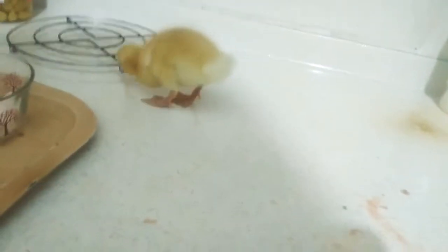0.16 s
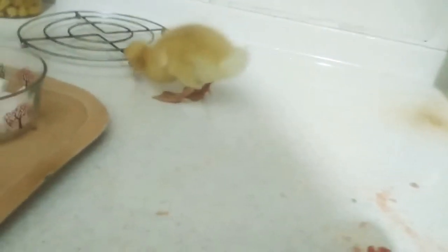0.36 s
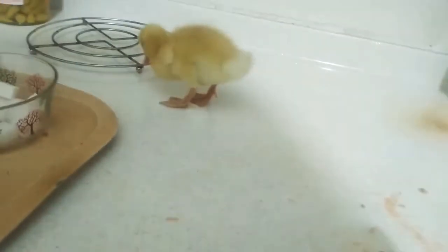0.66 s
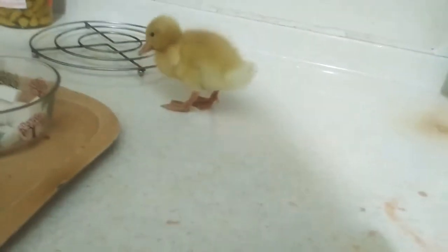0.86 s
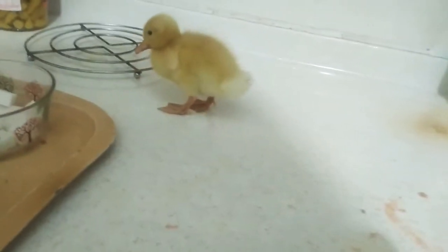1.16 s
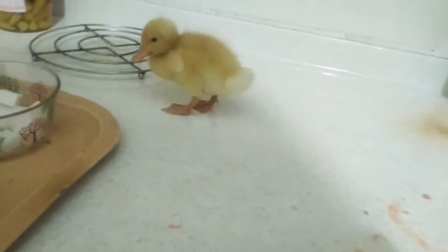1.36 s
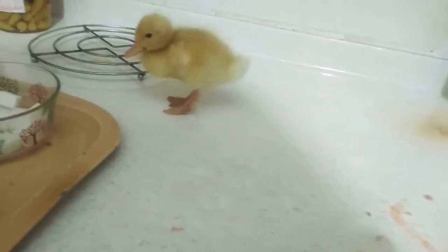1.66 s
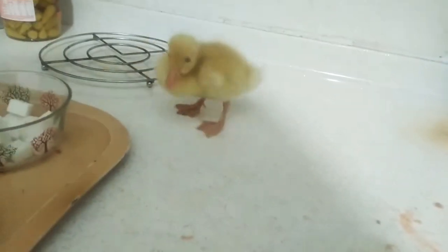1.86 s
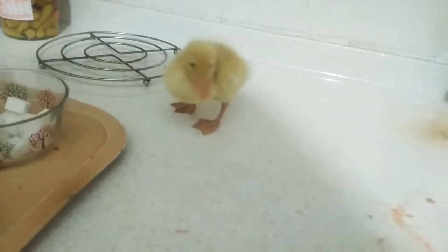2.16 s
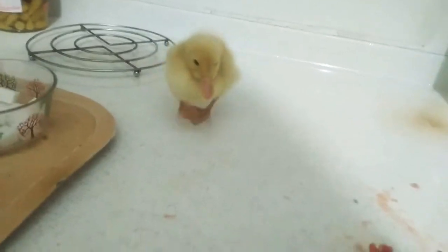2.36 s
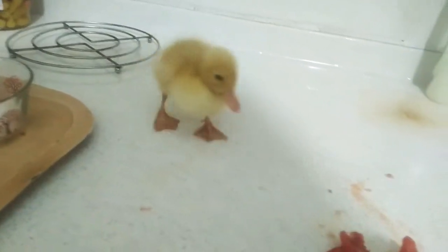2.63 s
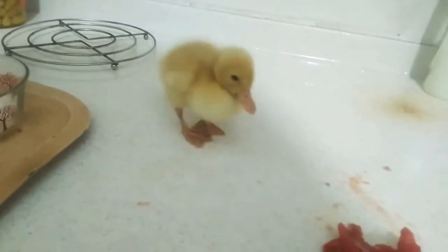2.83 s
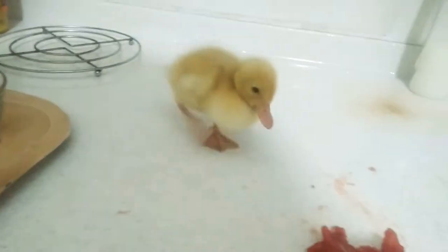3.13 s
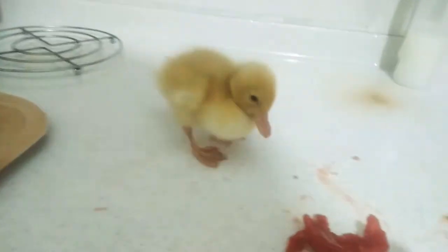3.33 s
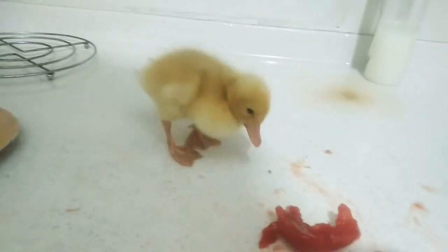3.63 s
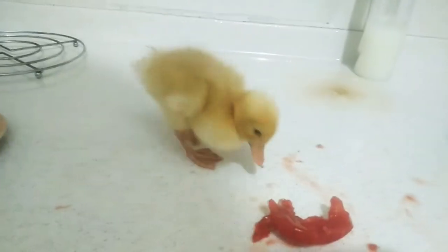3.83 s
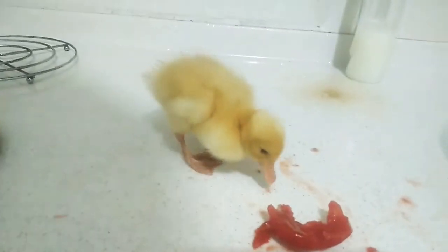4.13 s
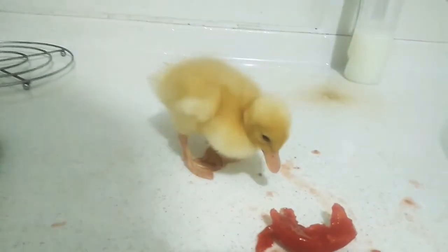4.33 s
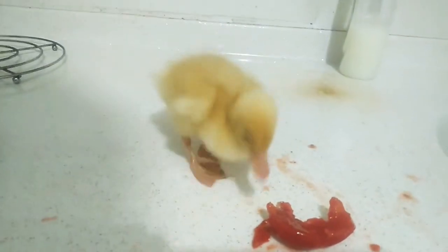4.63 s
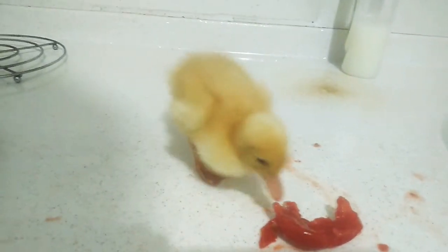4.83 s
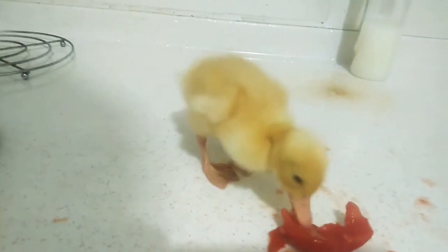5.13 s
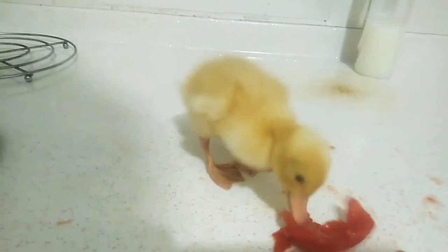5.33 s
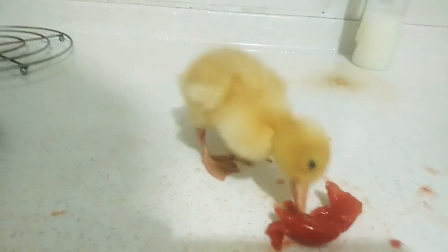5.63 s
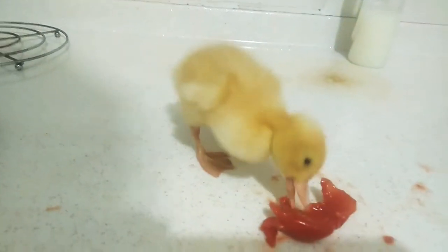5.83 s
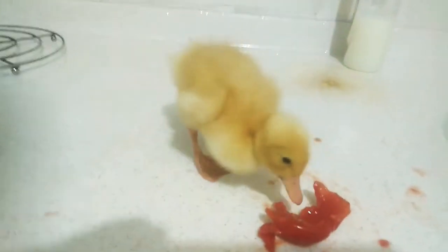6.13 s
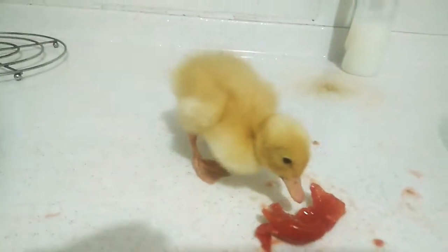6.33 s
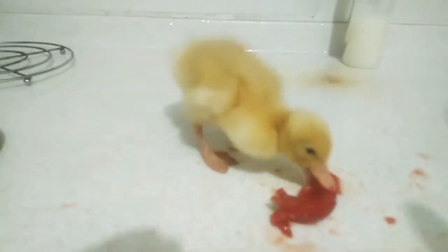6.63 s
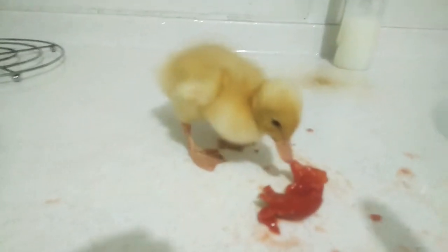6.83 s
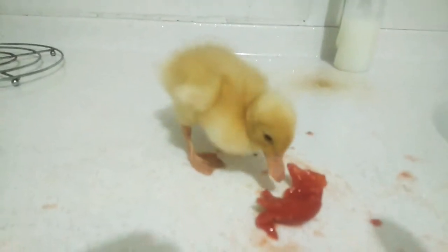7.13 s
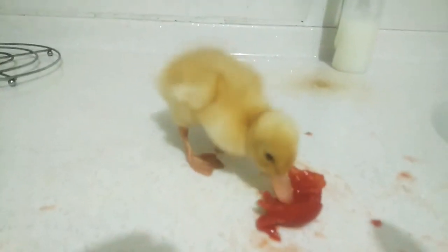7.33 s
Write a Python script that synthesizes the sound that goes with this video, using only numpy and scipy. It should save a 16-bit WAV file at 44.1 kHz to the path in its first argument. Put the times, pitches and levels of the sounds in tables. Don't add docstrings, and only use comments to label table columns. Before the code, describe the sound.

A duckling gives short whistled peeps and warbles near a worktop being tapped steadily, then a finger scrapes across the microphone.

```python
import sys
import numpy as np
from scipy import signal
from scipy.fft import rfft, irfft
from scipy.io import wavfile
from scipy.ndimage import uniform_filter1d

SR = 44100
rng = np.random.default_rng(int(sys.argv[2]) if len(sys.argv) > 2 else 0)


def boost_factor(decibels):
    exponent = np.asarray(decibels, float) / 20
    return 10 ** exponent


def to_wav(s):
    ch = np.atleast_2d(s).T
    pcm = np.round(np.clip(ch, -1, 1) * 32767)
    wavfile.write(sys.argv[1], SR, pcm.astype(np.int16))


N = 329868
T = np.arange(N) / SR
HALF_SECOND = T[:SR // 2]
HZ = np.fft.rfftfreq(N, 1 / SR) + 1
PAUSE_DB, PAUSE_TOP_HZ = 16, 12800


def on_hz(table, hz=HZ):
    f, v = np.transpose(table)
    return np.interp(np.log(hz), np.log(f), v)


def colour(x, gain):
    return irfft(rfft(x) * gain, N)


def unit(x):
    return x / np.sqrt(np.mean(x ** 2))


def walk(rate, shape=()):
    k = int(SR / rate)
    held = np.repeat(rng.standard_normal(shape + (N // k + 1,)), k, axis=-1)[..., :N]
    return unit(uniform_filter1d(uniform_filter1d(held, k), k))


def noise():
    return rng.standard_normal((2, N))


def spikes(s, size):
    x = np.zeros(N)
    x[np.round(np.asarray(s) * SR).astype(int)] = size
    return x


def sides(pan_db):
    return boost_factor(np.array([pan_db, -pan_db]) / 2)


def fold(x, response):
    return signal.fftconvolve(np.atleast_2d(x), np.atleast_2d(response), axes=1)[:, :N]


def room(x, t60, wet_db, gap_s):
    t = HALF_SECOND
    tail = rng.standard_normal((2, len(t))) * boost_factor(-60 * t / t60) * (t > gap_s)
    return fold(x, tail / np.sqrt(np.sum(tail ** 2) / 2)) * boost_factor(wet_db)


def treble():
    split_hz = 589
    return 1 / (1 + (split_hz / HZ) ** 12)


# f/Hz, level/dB per Hz
AIR = [(12, -26), (20, 0.5), (70, -9), (134, -11), (161, -18), (268, -20.5), (458, -25), (496, -33.5),
       (583, -34.5), (666, -42.5), (742, -37.5), (996, -44.5), (4230, -47.5), (5100, -49.5), (12000, -57),
       (15600, -63), (22000, -120)]
# f/Hz, share 0-1
LIKENESS = [(25, 0.27), (60, 0.37), (130, 0.89), (290, 0.56), (640, 0.31), (1400, 0.04), (15000, 0)]
# f/Hz, width/Hz, level/dB
HUMS = [(279.8, 38, -71.5), (595, 37, -94.5)]


def kitchen():
    like = np.clip(on_hz(LIKENESS), 0, 1)
    air_db = on_hz(AIR, np.minimum(HZ, 12000))
    air_db = air_db - 0.58 * (HZ > PAUSE_TOP_HZ)
    mid, side = rfft(noise()) * np.sqrt([1 + like, 1 - like]) * boost_factor(air_db)
    air = np.array([mid + side, mid - side])
    out = 0
    for octave in range(4, 16, 2):
        share = np.cos(np.pi / 4 * np.clip(np.log2(HZ) - octave, -2, 2)) ** 2
        out = out + irfft(air * share, N) * boost_factor(0.72 * walk(4.9))
    out = out * boost_factor(-61.5) / np.sqrt(np.mean(out.mean(axis=0) ** 2))
    for hz, width, db in HUMS:
        resonance = 1 / (1 + (2 * (HZ - hz) / width) ** 2)
        out = out + boost_factor(db) * unit(colour(rng.standard_normal(N), resonance))
    return out + colour(out, treble()) * (boost_factor(PAUSE_DB) - 1)


# t/s, sliding level/dB, pressure level/dB
STROKES = [
    [(6.74, -76, -68), (6.798, -59.5, -62), (6.83, -58, -70), (6.872, -59, -65), (6.974, -49.5, -51.5),
     (7.03, -57, -57), (7.075, -70, -54)],
    [(7.115, -88, -53), (7.142, -73, -39.5), (7.2, -61, -34), (7.25, -50.5, -40.5), (7.3, -89, -42.5)],
    [(7.3, -96, -52), (7.324, -74, -32.5), (7.374, -57, -42.5), (7.42, -86, -70)],
]


def strokes():
    hiss_db, rumble_db = np.full((2, N), -140.)
    for stroke in STROKES:
        s, slide, press = np.transpose(stroke)
        on = slice(int(s[0] * SR), int(s[-1] * SR))
        hiss_db[on] = np.interp(T[on], s, slide)
        rumble_db[on] = np.interp(T[on], s, press)
    grip_db = rumble_db + 56
    slip_db = 3.2 * np.minimum(grip_db, 0)
    scrape_db = -57.0 + 0.43 * (hiss_db + 54) + 0.68 * grip_db + slip_db
    grains = noise() * boost_factor(2.92 * rng.exponential(size=(2, N))) * boost_factor(walk(120))
    hiss_colour = [(2000, -27.0), (4000, -4), (8000, -6), (12000, -5.5), (15500, 0.5)]
    scrape_colour = [(200, 3.5), (700, 0.5), (2500, 0.0), (5000, -8.5), (9000, -29)]
    rumble_colour = [(15, 7), (40, 0.5), (200, -15.5), (500, -24.0), (2000, -51)]
    hiss = unit(colour(grains, boost_factor(on_hz(hiss_colour))))
    scrape = unit(colour(grains, boost_factor(on_hz(scrape_colour))))
    rumble = unit(colour(noise(), boost_factor(on_hz(rumble_colour))))
    left_db = np.array([hiss_db + 11.0, scrape_db + 7.5, rumble_db + 3.5])
    leak_db = np.array([[-42.], [-26.], [-24.]])
    gains = boost_factor(np.stack([left_db, left_db + leak_db], axis=1))
    return (np.array([hiss, scrape, rumble]) * gains).sum(axis=0)


# t/s, level/dB, signed push, fade/s
JOLTS = [
    (7.182, -20, -1.44, 0.0023),
    (7.211, -17, 0.74, 0.011),
    (7.251, -16, -0.64, 0.0055),
    (7.277, -14, 0.34, 0.0055),
    (7.315, -16, -1.66, 0.0021),
    (7.339, -15.5, 1, 0.0062),
    (7.371, -27, -0.71, 0.036),
]
# t/s, level/dB, left minus right/dB, centre f/Hz
SNAPS = [
    (3.77, -39, -4, 7500),
    (6.768, -62, 19, 5966),
    (6.902, -50, 19, 5070),
    (6.929, -39, 33, 6000),
    (6.962, -47, 23.5, 2600),
    (6.977, -38.5, 31, 2500),
    (7.218, -49, -3, 1514),
    (7.238, -35, -3, 2000),
    (7.288, -37, 12, 2500),
    (7.318, -61, 16, 3000),
]


def finger():
    rub = strokes()
    for s, db, way, fade in JOLTS:
        start = int(s * SR)
        age = T[:N - start]
        rub[0, start:] += way * boost_factor(db) * (1 - np.exp(-age / 0.0017)) * np.exp(-age / fade)
    for s, db, pan_db, hz in SNAPS:
        start = int(s * SR)
        age = T[:N - start]
        ring = np.sin(2 * np.pi * hz * age) * np.exp(-age * hz / 0.74)
        rub[:, start:] += np.outer(boost_factor(db) * sides(pan_db), ring)
    return rub


# f/Hz, level/dB, t60/s
BOARD = [(52.95, -10.5, 0.92), (93, -3.5, 0.21), (102.6, -13.5, 0.68), (119.3, -6, 0.46),
         (304.8, -22, 0.48), (327.4, 0.5, 0.09), (360, -10.5, 0.46), (432.6, -5.5, 0.15),
         (412.5, -17.5, 0.18), (448, -10.5, 0.26), (575, -9.5, 0.22), (612, -15.5, 0.4),
         (721.7, -12.5, 0.26), (720, -26, 0.13), (840, -34, 0.08), (1262, -20, 0.27)]


def board_ring(s, boom_db, soft_db):
    push = np.hanning(int(0.0012 * SR))
    half = N // 2
    board = 0
    for hz, db, t60 in BOARD:
        strikes = spikes(s - .0062, boost_factor(boom_db + 1.2 * rng.standard_normal(len(s))))[:half]
        if hz > 200:
            strikes = strikes * boost_factor(spikes(s - .0062, soft_db)[:half])
            strikes = 0.77 * (strikes + 0.49 * np.roll(strikes, int(0.009404 * SR)))
        pole = np.exp((2j * np.pi * hz - np.log(1000) / t60) / SR)
        board = board + boost_factor(db) * signal.lfilter([1], [1, -pole], strikes).imag
    board = fold(np.pad(board, (0, N - len(board))), push / push.sum()) * boost_factor(2.0)
    return signal.lfilter(*signal.butter(2, 45, "high", fs=SR), board)


def cupboard_thump(s, boom_db, soft_db):
    t = HALF_SECOND
    blows = spikes(s - .002, boost_factor(boom_db + 1.1 * soft_db))
    cupboard = noise()
    fresh = cupboard * fold(blows, boost_factor(-60 * t / 0.38))
    same = fold(blows, cupboard[:, -len(t):] * boost_factor(-60 * t / 0.36))
    mid, side = 0.9 * fresh + 0.6 * same
    thump = np.array([mid + 0.37 * side, mid - 0.41 * side])
    thump_colour = [(30, -17), (60, 8.0), (130, 11.5), (215, -1.5), (400, 8.5), (700, -8.5),
                    (1100, -26.5), (12000, -70)]
    return colour(thump, boost_factor(on_hz(thump_colour)))


# f/Hz, level/dB per Hz
TICK = [(600, -1.5), (1200, 12), (2500, -7.5), (5000, -2.5), (8000, -14), (15000, -29)]


def tick_crack(s, tick_db):
    crack = noise() * fold(spikes(s, boost_factor(tick_db)), np.exp(-HALF_SECOND / .0016))
    return colour(crack, boost_factor(on_hz(TICK) + 17))


def tick_echo(s, tick_db):
    echo = noise() * fold(spikes(s + 0.001, boost_factor(tick_db)), boost_factor(-60 * HALF_SECOND / 0.31))
    echo_colour = [(600, 11.5), (1300, 7), (2500, -2.0), (5000, -12.5), (9000, -20), (15000, -54)]
    return boost_factor(4.0) * colour(echo, boost_factor(on_hz(echo_colour)))


# tick t/s, tick level/dB, boom level/dB
TAPS = [(0.0527, -55.5, -38.5), (0.229, -53, -38.5), (0.4025, -56.5, -40.5), (0.5724, -55, -41),
        (0.7351, -53.5, -39.5), (0.9108, -53, -40.5), (1.0846, -52.5, -40.5), (1.2506, -54.5, -41),
        (1.4239, -57, -42.5), (1.5931, -55, -41), (1.7599, -57, -41.5), (1.938, -54, -42),
        (2.1092, -61, -44), (2.282, -69, -43), (2.4494, -50.5, -40.5), (2.6213, -50.5, -39.5)]


def taps():
    s, tick_db, boom_db = np.transpose(TAPS)
    soft_db = 1.08 * np.minimum(tick_db - boom_db + 13, 0)
    solid = board_ring(s, boom_db, soft_db) + cupboard_thump(s, boom_db, soft_db)
    return solid + tick_crack(s, tick_db) + tick_echo(s, tick_db)


def peep_arch(t, start, end, top_hz, end_hz, level_db):
    start_hz, top_share = 2250, 0.54
    share = np.clip((t - start) / (end - start), 0, 1)
    rise = (top_hz - start_hz) * np.clip(1 - share / top_share, 0, 1) ** 1.95
    fall = (top_hz - end_hz) * np.clip((share - top_share) / (1 - top_share), 0, 1) ** 1.8
    return top_hz - rise - fall, level_db - (3 * rise + 10.5 * fall) / 1000


# t/s, length/s, top f/Hz, end f/Hz, level/dB rms
PEEPS = [(0.112, 0.042, 2950, 2500, -57), (0.74, 0.044, 3245, 2755, -53), (0.919, .038, 2540, 2410, -64.5),
         (1.346, 0.055, 3337, 2426, -54.5), (1.511, 0.05, 3363, 2423, -52.5),
         (1.676, 0.051, 3170, 2410, -53.5), (1.933, 0.051, 3453, 2700, -53.5),
         (2.097, 0.049, 3480, 2966, -51.5), (2.394, .047, 3490, 3054, -51.5),
         (2.559, 0.043, 3527, 3346, -47.5), (2.84, 0.032, 3596, 3160, -46),
         (3.004, 0.049, 3737, 2940, -44.5), (3.187, 0.036, 3055, 2740, -56.5),
         (3.773, 0.046, 3530, 2900, -51.5), (4.485, .043, 3547, 3095, -50.5),
         (4.864, .055, 3637, 2800, -49.5), (5.04, .06, 3713, 2725, -46.5), (5.2, .057, 3572, 3150, -48.5),
         (5.96, 0.052, 3608, 3000, -46), (6.656, .061, 3243, 2300, -48), (6.981, 0.047, 3145, 3030, -46.5),
         (7.175, 0.03, 2810, 2400, -45)]
# t/s,
# f/Hz, effort level/dB rms
WARBLES = [
    [(3.503, 2200, -61), (3.528, 3466, -45), (3.543, 3600, -45.5), (3.572, 2940, -60), (3.591, 2940, -58),
     (3.618, 3330, -54.5), (3.628, 3504, -41.5), (3.67, 3430, -46.5), (3.687, 3150, -68)],
    [(4.197, 2250, -40), (4.208, 3050, -55.5), (4.229, 3600, -52.5), (4.261, 2965, -54), (4.299, 2890, -53),
     (4.322, 3150, -53.5), (4.344, 3330, -57)],
    [(4.344, 3330, -56), (4.362, 3433, -51), (4.381, 3430, -64.5), (4.397, 3440, -54.5), (4.414, 2950, -60),
     (4.425, 2720, -67)],
    [(5.672, 2240, -53.5), (5.69, 3320, -47), (5.703, 3610, -57), (5.719, 3280, -45.5), (5.74, 2690, -54),
     (5.75, 2590, -56)],
    [(5.808, 3030, -54), (5.835, 3405, -43.5), (5.848, 3500, -48.5), (5.867, 3270, -43.5),
     (5.89, 3100, -54.5), (5.9, 2880, -55)],
]


def calls():
    hz, db = np.full(N, np.nan), np.full(N, -140.)
    spans = [(s, s + length) for s, length, *_ in PEEPS]
    spans += [(w[0][0], w[-1][0]) for w in WARBLES]
    for k, (start, end) in enumerate(spans):
        on = slice(int(start * SR), int(end * SR))
        t = T[on]
        if k < len(PEEPS):
            hz[on], db[on] = peep_arch(t, start, end, *PEEPS[k][2:])
        else:
            s, pitch, effort = np.transpose(WARBLES[k - len(PEEPS)])
            hz[on] = uniform_filter1d(np.interp(t, s, pitch), size=300, mode="nearest")
            db[on] = np.interp(t, s, effort)
        attack = np.clip(1 - (t - start) / 0.0055, 0, 1)
        release = np.clip(1 - (end - t) / 0.0049, 0, 1)
        db[on] -= 30.5 * (attack + release)
    sung = ~np.isnan(hz)
    return np.interp(T, T[sung], hz[sung]), db


# t/s, left minus right/dB
FACING = [
    (0.1, -6),
    (1.3, -4.5),
    (2.1, -10.5),
    (2.6, -10),
    (2.9, -9),
    (4.3, -6),
    (6.7, -5),
    (7.0, -9),
    (7.2, -3),
]


def duckling():
    hz, db = calls()
    hz = uniform_filter1d(hz, size=100)
    gain = uniform_filter1d(boost_factor(db), size=60) * np.sqrt(2)
    glide = uniform_filter1d(np.gradient(hz) * SR, size=500)
    bend = np.clip(-np.gradient(glide) * SR / 2670000.0, 0, 1) ** 2
    flutter = np.sin(2 * np.pi * np.cumsum(680 + 90 * walk(200)) / SR) + 0.69 * walk(2500)
    strain = np.clip(np.abs(glide) / 36000.0 + 0.6 * bend, 0, 1)
    throb = boost_factor(3.6 * strain * walk(330))
    phase = 2 * np.pi * np.cumsum(hz * (1 + 0.0019 * walk(150))) / SR
    facing_db = np.interp(T, *np.transpose(FACING))
    octave_db = -25.5 - 1.16 * (facing_db + 5.5) - 8 * (hz - 2600) / 1000
    octave = boost_factor(octave_db - 0.67 * np.clip(db + 50.5, -12, 10))
    whistle = (1 + boost_factor(-18.0) * bend * flutter) * np.sin(phase)
    voice = gain * throb * (whistle + octave * np.sin(2 * phase))
    ports = voice * sides(facing_db) * boost_factor(walk(60, (2,)))
    ports[0] = np.roll(ports[0], 2)
    near_wall = room(voice, 0.052, -6.0, .003)
    return ports + near_wall + room(voice, 0.28, -14.0, 0.011)


def scene():
    return kitchen() + finger() + taps() + duckling()


def top_cut(x):
    return signal.sosfilt(signal.butter(12, 15790, fs=SR, output="sos"), x)


def record(dry):
    open_db, top_hz = -77, 15700
    high = colour(dry, treble())
    watched = colour(dry, treble() / (1 + (HZ / 7500) ** 4))
    power = uniform_filter1d((watched ** 2).mean(axis=0), int(0.0044 * SR))
    over_db = 10 * np.log10(power + 1e-18) - open_db - PAUSE_DB
    opening = uniform_filter1d(1 / (1 + np.exp(-over_db / 4.2)), int(0.024 * SR))
    gated = dry + high * (boost_factor(PAUSE_DB * (opening - 1)) - 1)
    gated = gated - colour(gated, HZ > PAUSE_TOP_HZ) * np.clip(1.8 - 2.9 * opening, 0, 1)
    mix = colour(gated, HZ < top_hz)
    return top_cut(mix)


dry = scene()
out = record(dry)
to_wav(out)
```